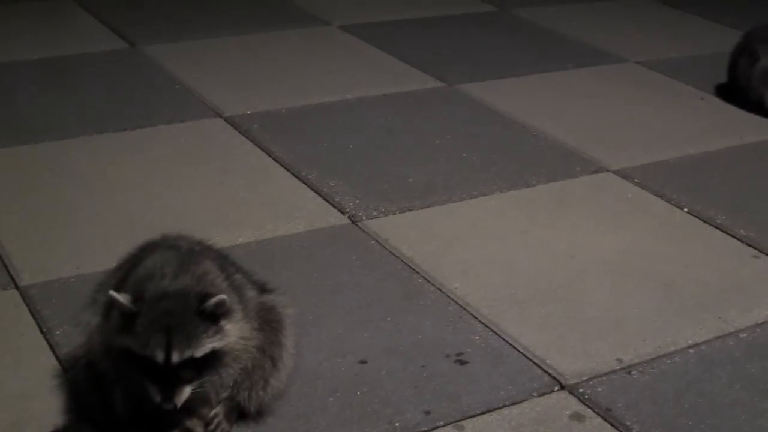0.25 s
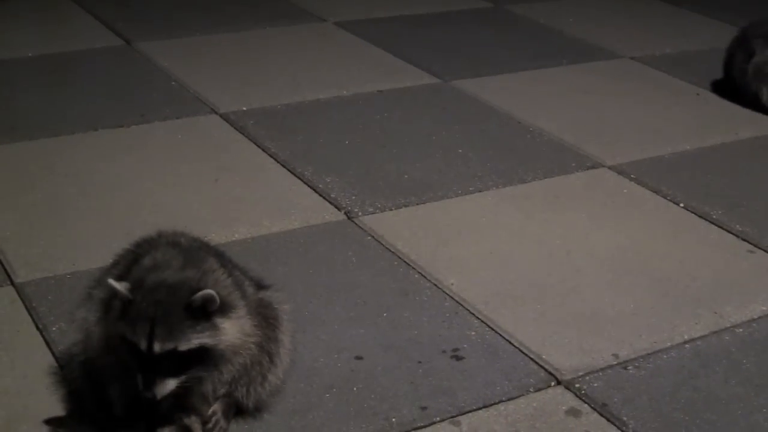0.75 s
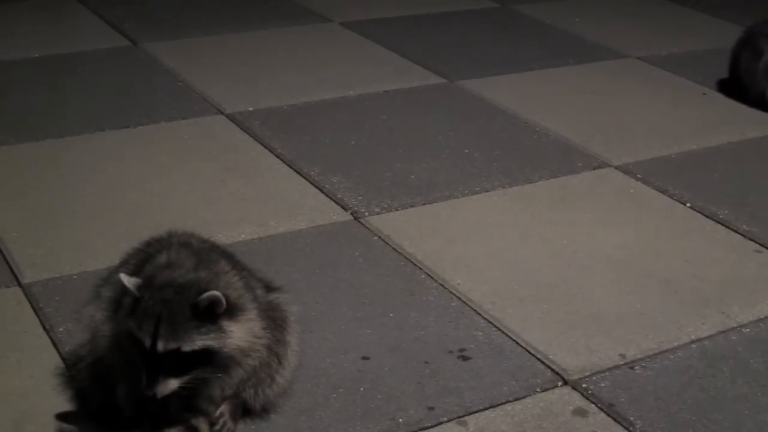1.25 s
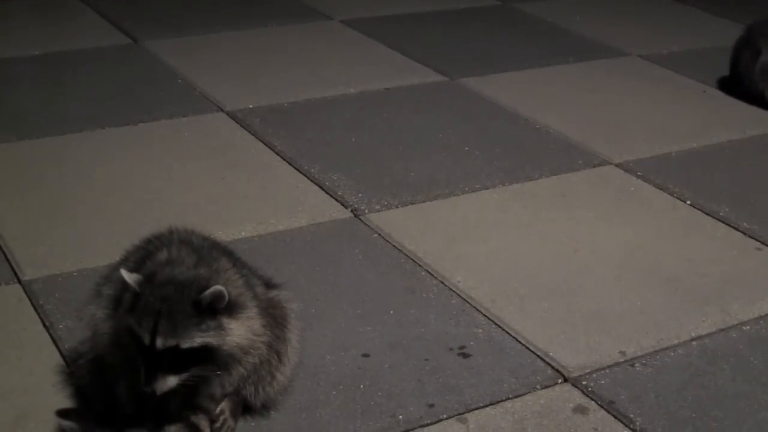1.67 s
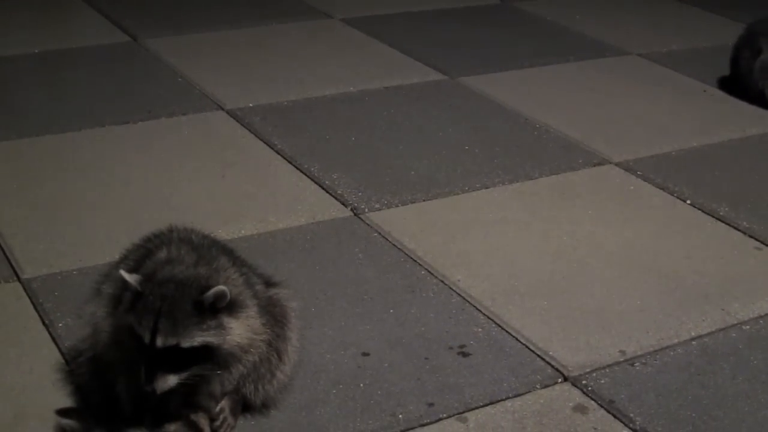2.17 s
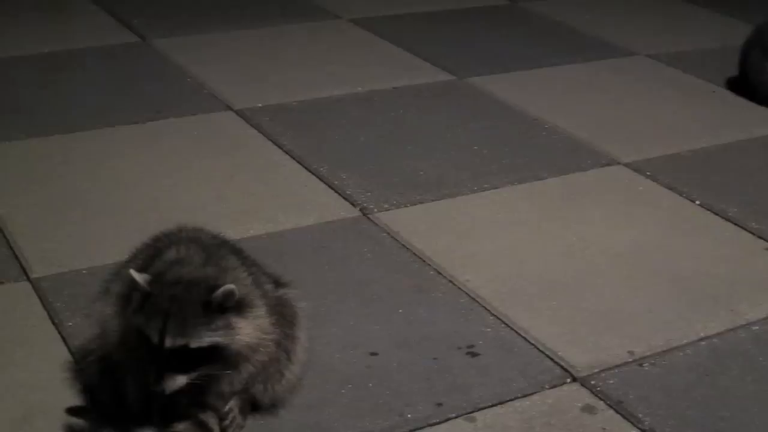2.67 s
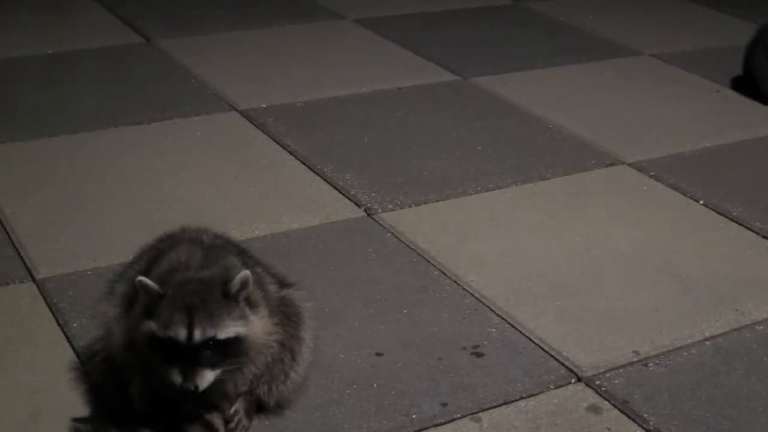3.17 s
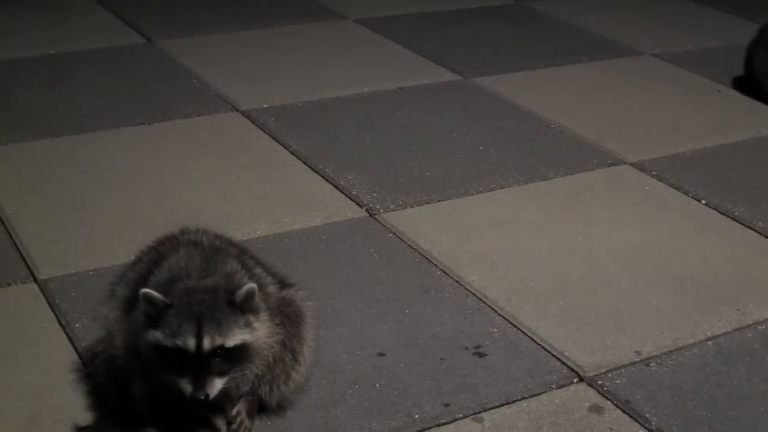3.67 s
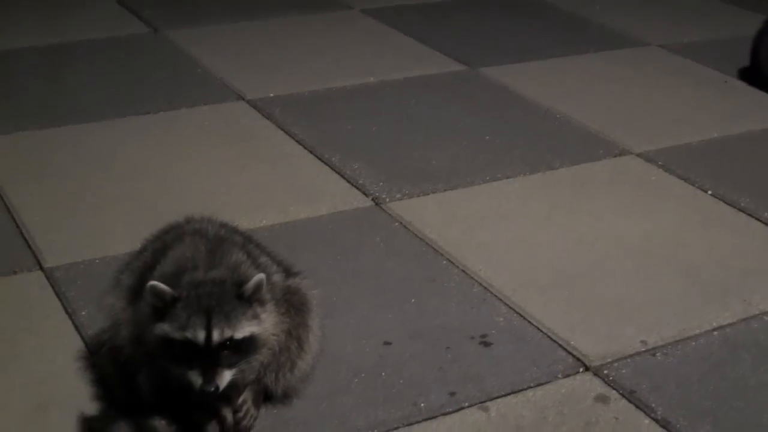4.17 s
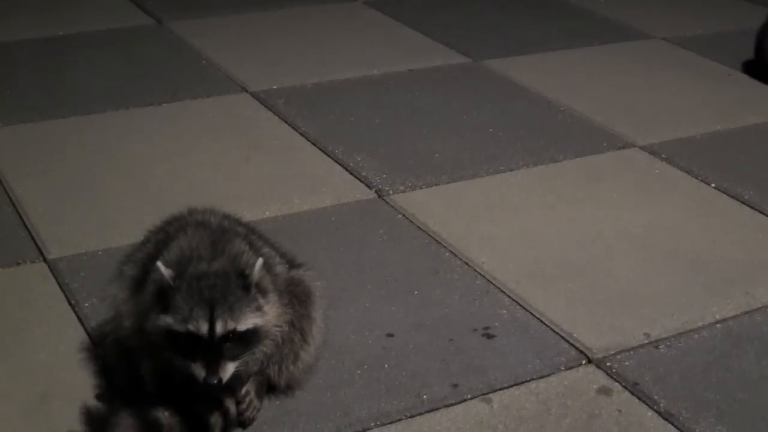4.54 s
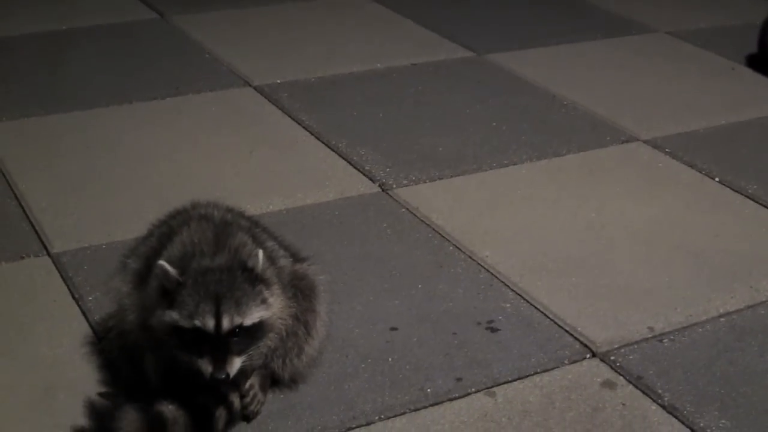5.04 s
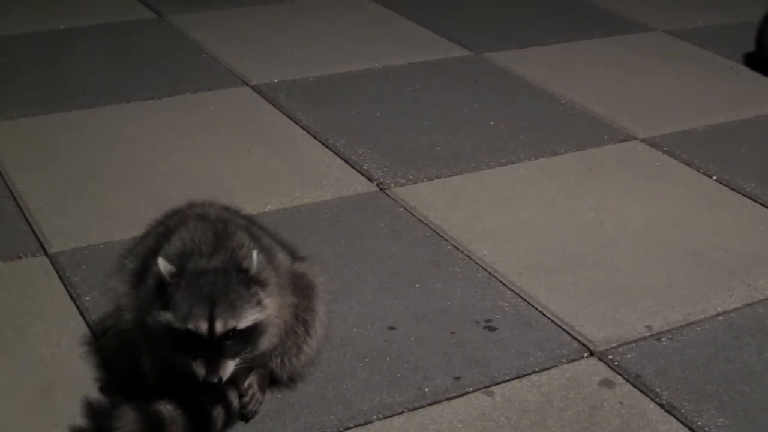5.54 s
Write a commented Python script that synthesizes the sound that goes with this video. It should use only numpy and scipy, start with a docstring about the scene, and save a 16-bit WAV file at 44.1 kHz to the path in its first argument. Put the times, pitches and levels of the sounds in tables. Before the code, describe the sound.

A young raccoon calls close to the microphone on a stone terrace, with a slight short echo. Each call is a rapid trill of tiny, high, slightly raspy chirps that flick upward, closed by a brighter, slightly lower yelp. The first runs from 0.5 to 0.8 seconds, growing louder. The second runs from 1.2 to 1.7 seconds and is followed by two soft, falling whimpers. Claws tick faintly on stone at 2.1 and 2.3 seconds. The longest trill lasts from 2.5 to 3.3 seconds, and a raspier one from 4.0 to 4.4. A paw barely brushes the paving afterwards, and one more claw ticks near 5.2 seconds. Throughout, a distant engine drones low and quiet under the soft rush of a town and a light hiss with a very faint whine. Far tyres hum faintly from about 4.3 seconds until the end, near 5.8.

```python
"""Four trills of short rising chirps near 1 kHz: a young raccoon calling on a paved terrace at night.
A brighter, lower yelp closes each trill, and two soft whimpers follow the second. Each note is a
squeeze of the larynx, coloured by the mouth and echoed by nearby walls. Claws tick on the stone.
Behind it sit a droning engine, far tyres and the rush of a town; the camera adds hiss and a whine."""
import sys
import numpy as np
from scipy import signal
from scipy.fft import rfft, irfft, next_fast_len
from scipy.io import wavfile
from scipy.ndimage import map_coordinates

SR = 44100
rng = np.random.default_rng(int(sys.argv[2]) if len(sys.argv) > 2 else 0)


def to_wav(sig):
    """Store sig (one row per channel, or 1-D mono) as 16-bit WAV at the path in sys.argv[1].

    Samples outside -1..1 are clipped; the rate is SR.
    """
    pcm = np.clip(np.atleast_2d(sig), -1, 1) * 32767
    pcm = np.round(pcm).astype(np.int16)
    wavfile.write(sys.argv[1], SR, pcm.T)  # frames by channels


N = 256127
LEAD_S = .02  # run-up of each note before its push


def raccoon():
    """Four trills, each closed by a yelp, with thin high tones on some notes and two whimpers."""
    # start/s, end/s, second harmonic/dB, rasp/dB
    trills = [(0.5, 0.78, -24.5, -15.5), (1.18, 1.62, -19, -16.5), (2.53, 3.28, -20, -14.5),
              (4.02, 4.39, -22.5, -11.5)]
    # t/s, level/dB, pitch/Hz, length/s, attack/s, mouth resonance/Hz, upper harmonics/dB, squeak/dB
    chirps = [ (.55, -36, 1000, 0.019, .007, 2900, -22, -14),
              (0.609, -23.5, 973, .015, 0.0036, 2900, -15, -21),
              (.6647, -20, 986, .016, 0.0057, 2880, -17, -22),
              (0.7251, -12, 980, .016, 0.0091, 2850, -12, -34),
              (1.205, -18, 984, 0.017, 0.0079, 2980, -15.5, -34),
              (1.258, -20, 985, 0.015, .006, 3000, -15, -27),
              (1.309, -16.5, 990, .017, 0.0086, 3030, -17, -33),
              (1.37, -16.5, 997, 0.0237, 0.0075, 3150, -14, -25),
              (1.436, -15.5, 975, 0.0252, 0.014, 4300, -17.5, -19),
              (1.5138, -15, 986.5, 0.0213, 0.0067, 4320, -13.5, -24),
              (1.589, -26.5, 1019, 0.0226, 0.0085, 4000, -22, -12),
              (2.5622, -19, 981, 0.0184, 0.0054, 3400, -13.5, -27),
              (2.6617, -25, 989, 0.0194, 0.004, 3720, -15.5, -13),
              (2.716, -26.5, 991, 0.0224, 0.0049, 3700, -14, -11.5),
              (2.7656, -19.5, 1001, 0.0258, 0.0085, 3350, -14, -14),
              (2.8322, -22.5, 994, 0.0197, 0.0075, 3520, -14.5, -19),
              (2.8897, -23, 996, 0.022, 0.0059, 3840, -17, -24),
              (2.9538, -21.5, 1001, 0.0236, 0.0069, 3380, -13.5, -18),
              (3.0216, -17.5, 991, 0.024, 0.0088, 3350, -15, -19),
              (3.0898, -19.5, 978, 0.0178, 0.0093, 3620, -14, -10.5),
              (3.161, -15, 990, 0.0209, 0.0091, 4360, -18, -28),
              (3.2324, -16.5, 984, 0.0218, 0.0089, 3780, -20.5, -16.5),
              (4.051, -16, 936, 0.0096, 0.0065, 3430, -13, -37),
              (4.111, -19.5, 930, 0.011, 0.0037, 3250, -16, -24),
              (4.16, -14.5, 942, 0.0095, 0.0064, 3650, -22, -28),
              (4.2195, -17, 945, 0.0093, 0.005, 3700, -17, -31),
              (4.279, -13.5, 960, .012, 0.0079, 4120, -14, -37),
              (4.3468, -14, 966, 0.0144, 0.0086, 4150, -14, -32)]
    # t/s, level/dB, f/Hz
    high_tones = [(.608, -49, 5350), (.726, -44, 5780), (0.811, -43, 5530), (1.445, -54, 5200),
                  (1.518, -43, 5200), (2.563, -52, 5650), (2.766, -46, 5600), (4.052, -41, 5370)]
    # t/s, level/dB, pitch/Hz, glide/share, length/s, mouth resonance/Hz,
    # second harmonic/dB, upper harmonics/dB, rasp/dB, pitch jitter/share
    yelps = [ (0.8043, -14, 938, -.03, 0.015, 2730, -7.5, -11, -7, .03),
             (1.6567, -10.5, 968, 0.028, .016, 4950, -6.5, -13.5, -11, .017),
             (3.3102, -12.5, 930, -0.044, 0.0215, 4700, -3.5, -12, -14, .005),
             (4.426, -11, 932.4, -0.017, 0.012, 4180, -4, -12.5, -7, .032)]
    # t/s, level/dB, pitch/Hz, scoop/share, length/s, attack/s, second harmonic/dB, upper harmonics/dB
    whimpers = [(1.779, -22.5, 712, .28, .045, 0.034, -16, -16),
                (1.879, -29.5, 660, .13, 0.047, 0.026, -5.5, -9.5)]
    trill_at = lambda s: min(trills, key=lambda trill: abs(s - (trill[0] + trill[1]) / 2))
    calls = [(s, chirp(s, *row, trill_at(s))) for s, *row in chirps]
    calls += [(s, high_tone(*row)) for s, *row in high_tones]
    calls += [(s, yelp(*row)) for s, *row in yelps]
    calls += [(s, whimper(*row)) for s, *row in whimpers]
    return terrace(calls)


def chirp(s, db, pitch_hz, length, attack, mouth_hz, upper_db, squeak_db, trill):
    """A short note that holds its pitch, then flicks upward."""
    start, end, second_db, rasp_db = trill
    progress = (s - start) / (end - start)
    second_db += 6.5 * (progress - .5)  # the second harmonic grows through the trill
    rasp_db -= .22 * (db + 9)  # a weak chirp is breathier
    glide = .095 + 8 * (length - .0164)  # a long one flicks further up
    return note(db, pitch_hz, length, attack, mouth_hz, second_db, upper_db, rasp_db, squeak_db,
                scoop=.03114, glide=glide, jitter=.014,
                sag_db=10, hold_db=-5.5, lead_db=-29.5, shimmer_db=3, opening_s=.0042)


def yelp(db, pitch_hz, glide, length, mouth_hz, second_db, upper_db, rasp_db, jitter, attack=.01):
    """The mouth opens wide: a bright, rough, lower note."""
    return note(db, pitch_hz, length, attack, mouth_hz, second_db, upper_db, rasp_db, squeak_db=-29,
                scoop=.0394, glide=glide, jitter=jitter,
                sag_db=8.5, hold_db=2.5, lead_db=-23.5, shimmer_db=2, opening_s=.0078)


def whimper(db, pitch_hz, scoop, length, attack, second_db, upper_db, mouth_hz=4250):
    """A soft, clean, low note that slides down."""
    return note(db, pitch_hz, length, attack, mouth_hz, second_db, upper_db, rasp_db=-25, squeak_db=-45,
                scoop=scoop, glide=-.04, jitter=.0026,
                sag_db=9.5, hold_db=-4, lead_db=-25, shimmer_db=3.5, opening_s=.0044)


def note(db, pitch_hz, length, attack, mouth_hz, second_db, upper_db, rasp_db, squeak_db,
         scoop, glide, jitter, sag_db, hold_db, lead_db, shimmer_db, opening_s):
    """One squeeze of the larynx: a gliding, raspy tone whose overtones swell as the mouth opens."""
    # colour of throat and mouth above the second harmonic: f/Hz, level/dB
    formants = [(2000, 15.5), (2550, -19), (3050, 9), (3400, 8.5), (4100, 2), (4600, -8), (5400, -5.5),
                (6500, -16), (9000, -12.5), (12000, -8), (14000, -33)]
    # turbulence in the throat: f/Hz, level/dB
    turbulence = [(400, -38), (750, 3), (900, 11), (1200, -4.5), (1450, -8), (1750, 4.5), (2050, -12.5),
                  (2450, -28), (3200, -8.5), (4100, -14.5), (4700, -16.5), (5600, -18.5), (6800, -31),
                  (12000, -23), (15000, -58)]
    hoarse_rad, squeak_ratio, bass_cut_hz = 36 * jitter, 1.19, 395
    size = SR // 8
    t = np.arange(size) / SR - LEAD_S
    progress = np.clip(t / length, 0, 2)
    # the folds start to swing softly just before the full push
    lead = amp(lead_db) * np.exp(-(np.minimum(t, 0) / .007) ** 2)
    push = np.sin(np.pi / 2 * np.clip(t / attack, 0, 1)) ** 2
    release = np.exp(-(progress / 1.15) ** 9)
    pressure = (lead + (1 - lead) * push) * amp(-sag_db * progress) * release
    mouth_open = 1 - np.exp(-np.maximum(t, 0) / opening_s)
    # the pitch starts sharp, settles, then glides at the end
    contour = scoop * np.exp(-progress / .181) + glide * (np.minimum(progress, 1) ** 3 - .5 ** 3)
    phase = 2 * np.pi * np.cumsum(pitch_hz * (1 + contour + jitter * wobble(600, size))) / SR
    resonance = lambda hz: 1 + 2.2 / (1 + 1j * (hz - mouth_hz) / 190)
    buzz = sum(np.sin(k * phase + hoarse_rad * wobble(330, size) + rng.uniform(0, 2 * np.pi))
               for k in range(3, 16))
    upper = unit(filtered(buzz, lambda hz: amp(along(formants, hz)) * resonance(hz))) / np.sqrt(2)
    overtones = amp(second_db) * np.sin(2 * phase) + amp(upper_db) * np.sqrt(mouth_open) * upper
    # the overtones flutter more than the fundamental and shift by hold_db against it over the note
    overtones *= amp(hold_db * (progress - .5) + shimmer_db * wobble(318, size))
    tone = amp(.96 * wobble(312, size)) * np.sin(phase) + mouth_open * overtones
    # a second, higher oscillation beats against the first and roughens the middle of the note
    squeak_level = amp(squeak_db) * bell(t / length, .45, .6)
    squeak = squeak_level * np.sin(squeak_ratio * phase + wobble(214, size) + rng.uniform(0, 2 * np.pi))
    # air escapes once per cycle, most of it early in the note
    breath = unit(filtered(noise(turbulence, size), resonance))
    rasp = breath * (1 + .25 * np.sin(phase)) * amp(rasp_db - 4.5 * progress)
    voice = pressure * (tone + np.sqrt(mouth_open) * rasp) + squeak
    # so small a mouth radiates no bass
    return amp(db) * filtered(voice, lambda hz: 1 - bell(hz, 0, bass_cut_hz))


def high_tone(db, pitch_hz, rise_s=.003, waver=.014):
    """A brief, thin tone near 5.5 kHz: a whistle on some chirps, a ringing overtone on the first yelp."""
    size = SR // 10
    age = np.maximum(np.arange(size) / SR - LEAD_S, 0) / rise_s
    envelope = age * np.exp((1 - age ** 2) / 2)
    hz = pitch_hz * (1 + waver * wobble(370, size))
    return amp(db) * envelope * np.sin(2 * np.pi * np.cumsum(hz) / SR)


def terrace(calls, lag_s=.00006):
    """The calls reach two microphones directly, off the walls and scattered by the garden."""
    # wall echoes: delay/s, level/dB
    walls = [(.00601, -11.5), (.0089, -19), (.012, -23), (.0251, -9), (.0502, -21)]
    # reverb send; with the head bowed, more of the overtones arrive by reflection: f/Hz, level/dB
    scatter = [(1100, -16.5), (1900, -4), (3200, -5.5), (4200, 0), (12000, 0.5)]
    direct, tails = np.zeros(N), np.zeros((2, N))
    for s, call in calls:
        add(direct, s - LEAD_S, call)
        add(tails, s - LEAD_S, signal.fftconvolve(call[None], garden_tail(), axes=1))
    side = np.array([[-1], [1]])  # the right channel is earlier and a little brighter
    tilt = [(1000, 0), (2000, 1.3)]  # f/Hz, level/dB
    pan = lambda hz: np.exp(1j * np.pi * hz * lag_s * side) * amp(along(tilt, hz) * side)
    echoes = lambda hz: sum(amp(db) * np.exp(-2j * np.pi * hz * delay) for delay, db in walls)
    near = filtered(direct, lambda hz: pan(hz) * (1 + echoes(hz)))
    return near + diffuse(filtered(tails, lambda hz: amp(along(scatter, hz))))


def garden_tail(build_s=.0071):
    """A short reverb of scattered reflections that rings longest near 1 kHz."""
    # reverb time: f/Hz, t60/s
    decay_times = [(300, 0.047), (1000, 0.46), (2000, 0.24), (5000, 0.22), (12000, 0.083)]
    hz, t, spectra = signal.stft(rng.standard_normal((2, SR // 4)), SR, nperseg=256)
    decay = amp(-60 * t / along(decay_times, hz)[:, None])
    onset = 1 - np.exp(-t / build_s)
    tail = signal.istft(spectra * decay * onset, SR, nperseg=256)[1]
    return tail / np.sqrt(np.sum(tail ** 2) / 2)


def paws(tick_t60_s=.029):
    """Claws tick drily on stone, and a paw faintly brushes the paving."""
    # claw strikes: t/s, level/dB
    claws = [(2.102, -46), (2.293, -41.5), (5.154, -42.5)]
    # paw strokes: t/s, level/dB, half length/s
    brushes = [(4.515, -64, 0.061), (4.68, -61, .045), (5.3, -81, .07)]
    # f/Hz, level/dB
    tick_colour = [(500, -22), (1500, 1), (3200, -1), (6500, -4), (10000, -27), (15000, -25)]
    brush_colour = [(5000, -30), (9500, -10), (11000, 0), (12500, -18), (15000, -31)]
    t = np.arange(N) / SR
    strikes = sum(amp(db - 60 * np.abs(t - s) / tick_t60_s) * (t >= s) for s, db in claws)
    strokes = sum(amp(db) * bell(t, s, half_s) for s, db, half_s in brushes)
    return diffuse(strikes * noise(tick_colour, (2, N)) + strokes * noise(brush_colour, (2, N)))


def engine(overtone_trim_db=-13):
    """A far four-cylinder drone sags slightly in pitch; its overtones fade in and out in the air."""
    # firing rate: t/s, f/Hz
    speed = [(0, 102.4), (1.5, 102.5), (2.8, 101.7), (4.2, 99.55), (5.81, 100.7)]
    # fader of the firing tone: t/s, level/dB
    firing_fader = [(0.03, -70), (0.09, -57), (0.4, -50), (2.24, -46), (2.27, -48), (2.77, -48),
                    (3.01, -56.5), (3.26, -49), (5.49, -44.5), (5.75, -41)]
    # exhaust overtones: multiple of the four-stroke cycle, relative level/dB
    exhaust = [(3, -38), (6, -14), (7, 0.5), (8, 2), (9, -36), (10, -4.5), (11, -14.5), (12, -0.5),
               (16, -9.5), (20, -6.5), (24, -10), (28, -23)]
    # fader of the low overtones: t/s, level/dB
    low_fader = [(.2, -62), (1, -55), (1.8, -43.5), (2.5, -39.5), (3.35, -52.5), (3.8, -44.5), (4.6, -41),
                 (5.05, -48.5)]
    # fader of the high overtones: t/s, level/dB
    high_fader = [(.2, -42.5), (1, -45.5), (1.4, -46), (2.6, -46), (3.2, -43), (4.2, -40.5), (5.3, -43.5),
                  (5.7, -49)]
    cycle = 2 * np.pi * np.cumsum(curve(speed) / 4) / SR
    firing = amp(curve(firing_fader) + .3 * wobble(6)) * np.sin(4 * cycle)
    overtones = np.zeros(N)
    for order, db in exhaust:
        fade_db = curve(low_fader if order <= 8 else high_fader) + 2 * wobble(5)
        phase = order * cycle + .5 * wobble(7) + rng.uniform(0, 2 * np.pi)
        overtones += amp(db + fade_db) * np.sin(phase)
    return np.sqrt(2) * (firing + amp(overtone_trim_db) * overtones)


def traffic():
    """Tyres hum and sing far away: narrow bands of noise that fade in and out separately."""
    # tyre swells: t/s, half length/s, f/Hz, half width/Hz, level/dB
    swells = [(4.65, 0.41, 516, 64, -56.5), (4.8, 0.3, 650, 70, -53.5), (4.7, 0.47, 840, 61, -61),
              (5.42, 0.036, 850, 23, -56), (5.5, 0.068, 795, 50, -56), (5.68, 0.1, 821, 8, -52.5),
              (5.745, 0.091, 860, 8, -54)]
    t = np.arange(N) / SR
    tyres = np.zeros((2, N))
    for s, half_s, centre_hz, half_hz, db in swells:
        band = unit(filtered(rng.standard_normal((2, N)), lambda hz: bell(hz, centre_hz, half_hz)))
        tyres += amp(db) * bell(t, s, half_s) * band
    return diffuse(tyres)


def town(level_db=-46, swell_db=1):
    """The soft, slowly swelling rush of a distant town."""
    # colour of the rush: f/Hz, level/dB
    rush = [(15, -66), (25, -16), (43, -15.5), (76, -8), (110, -8), (150, -9.5), (264, -5.5), (351, -10.5),
            (413, -7), (549, -12), (839, -7.5), (1380, -17.5), (3450, -19.5), (5800, -22.5), (7000, -28),
            (9100, -67)]
    return amp(level_db + swell_db * wobble(2.283)) * diffuse(noise(rush, (2, N)))


def diffuse(pair):
    """Two unrelated signals at two close microphones: alike in the bass, apart in the treble."""
    # stereo width of sound from all around: f/Hz, side over mid/dB
    width = [(60, -12), (110, -9), (200, -13.5), (380, -12), (700, -12), (1290, -7.5), (2380, -3.5),
             (4400, 1.5), (8120, 0), (15000, -2.5)]
    angle = lambda hz: np.arctan(amp(along(width, hz)))
    mid, side = filtered(pair, lambda hz: np.array([np.cos(angle(hz)), np.sin(angle(hz))]))
    return np.array([mid + side, mid - side])


def amp(db):
    """Decibels to gain."""
    return 10 ** (np.asarray(db) / 20)


def unit(x):
    """Scaled to rms 1."""
    return x / np.sqrt(np.mean(x ** 2) + 1e-20)


def bell(x, centre, half_width):
    """A Gaussian bump of height 1."""
    return np.exp(-((x - centre) / half_width) ** 2)


def along(points, hz):
    """(f/Hz, value) points joined on a log axis."""
    f, values = np.transpose(points)
    return np.interp(np.log(hz + 1), np.log(f + 1), values)


def curve(points):
    """(t/s, value) points joined into one value per sample."""
    return np.interp(np.arange(N) / SR, *np.transpose(points))


def wobble(rate, size=N):
    """A smooth random curve, rate knots a second."""
    knots = rng.standard_normal(int(size * rate / SR) + 4)
    return map_coordinates(knots, [np.arange(size) * rate / SR])


def filtered(x, response):
    """x shaped by a frequency response."""
    n = x.shape[-1]
    padded = next_fast_len(n + 8192)
    return irfft(rfft(x, padded) * response(np.fft.rfftfreq(padded, 1 / SR)), padded)[..., :n]


def noise(spectrum, shape):
    """Coloured noise of rms 1."""
    return unit(filtered(rng.standard_normal(shape), lambda hz: amp(along(spectrum, hz))))


def add(track, s, sound):
    """Mix a sound into a track at time s."""
    part = track[..., round(s * SR):][..., :sound.shape[-1]]
    part += sound[..., :part.shape[-1]]


def scene():
    """The raccoon and its paws over the engine, the tyres and the town."""
    return raccoon() + paws() + engine() + traffic() + town()


def record(dry):
    """The camera adds hiss and a thin whine, notches out a band near 8 kHz and limits the treble."""
    # colour of the hiss: f/Hz, level/dB
    hiss_colour = [(1000, 1), (2500, 3), (5000, 1.5), (6200, -3), (7300, -10), (9200, -5.5), (11000, -4.5),
                   (13000, -7), (15500, -17)]
    whine_hz, notch_hz, top_hz = 8800, 8150, 15780
    hiss = amp([[-56.8], [-55.2]]) * diffuse(noise(hiss_colour, (2, N)))
    drift_rad = 1.05 * np.array([wobble(25), wobble(25)])
    whine = amp(-73) * np.sin(2 * np.pi * whine_hz * np.arange(N) / SR + drift_rad)
    notch = lambda hz: 1 - np.exp(-((hz - notch_hz) / 480) ** 6)
    return filtered(dry + hiss + whine, lambda hz: notch(hz) * (hz < top_hz))


dry = scene()
out = record(dry)
to_wav(out)
```